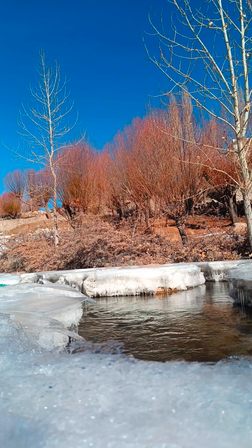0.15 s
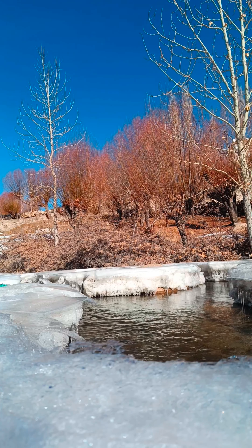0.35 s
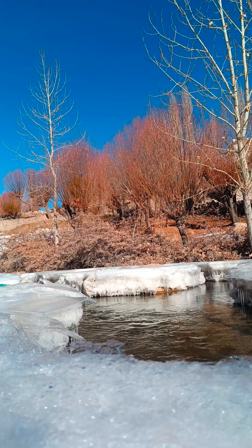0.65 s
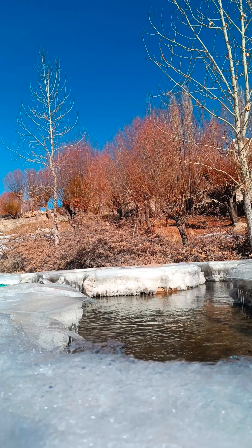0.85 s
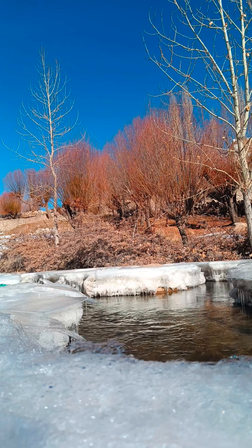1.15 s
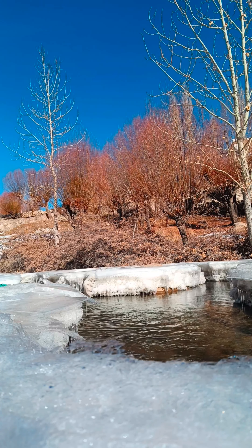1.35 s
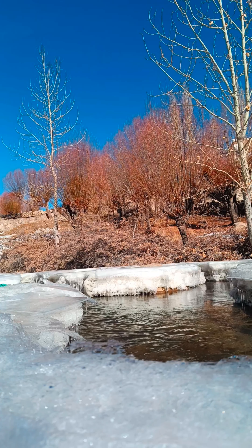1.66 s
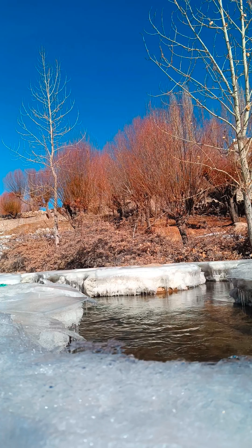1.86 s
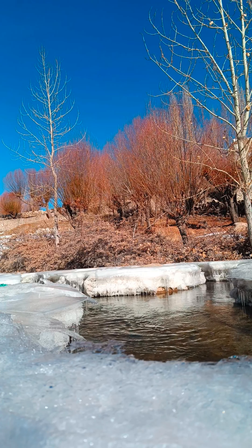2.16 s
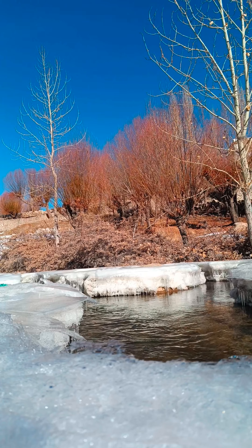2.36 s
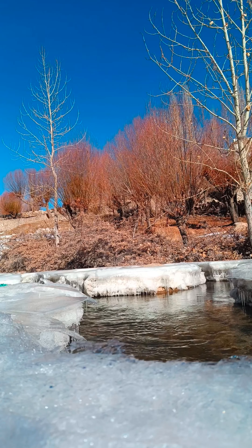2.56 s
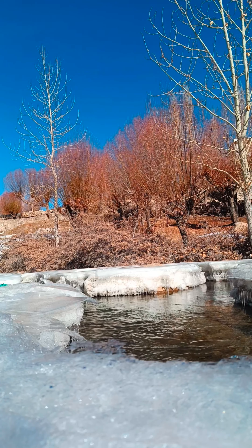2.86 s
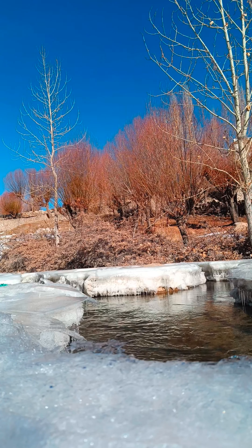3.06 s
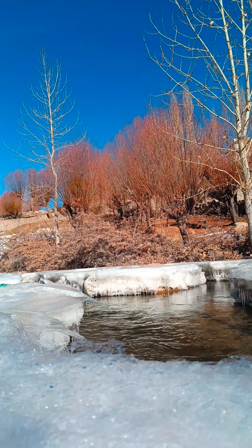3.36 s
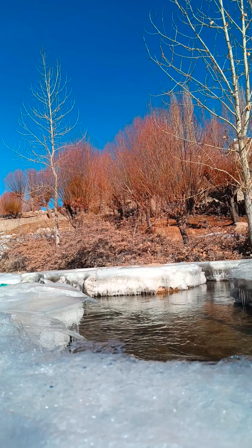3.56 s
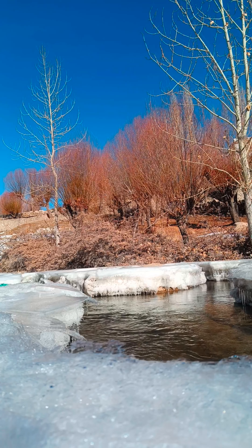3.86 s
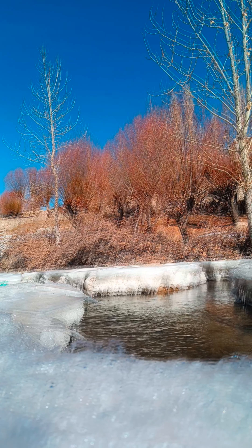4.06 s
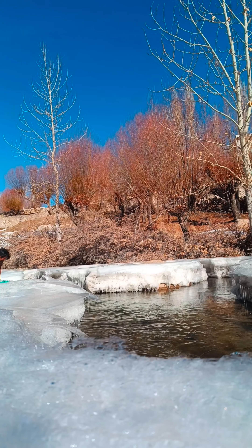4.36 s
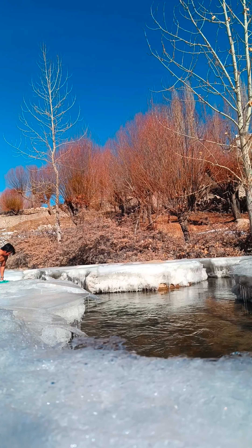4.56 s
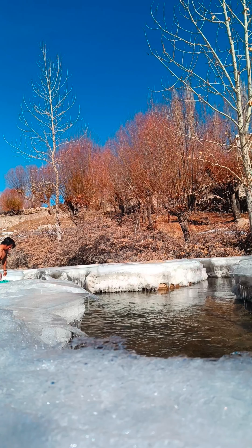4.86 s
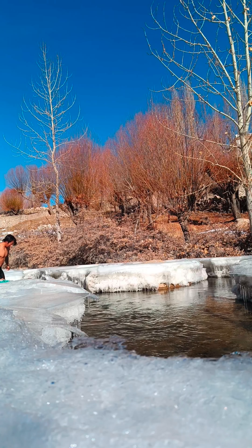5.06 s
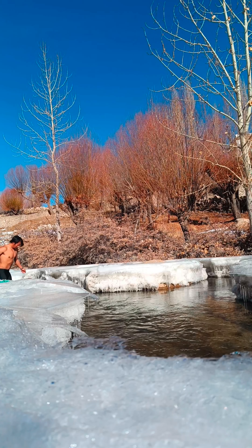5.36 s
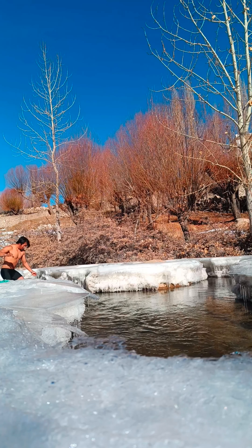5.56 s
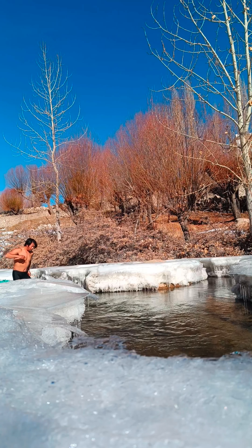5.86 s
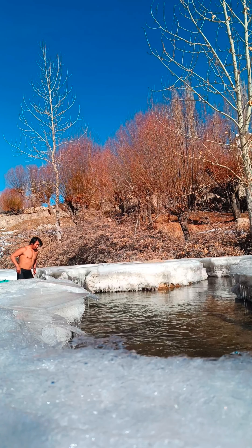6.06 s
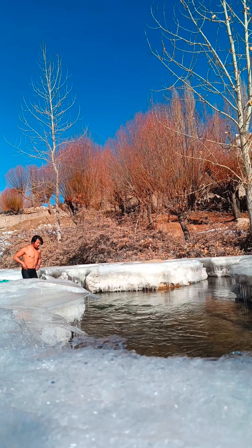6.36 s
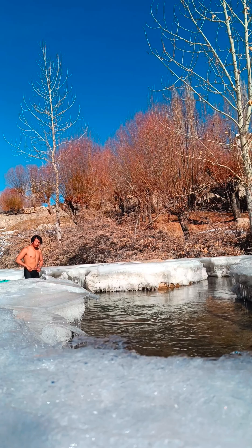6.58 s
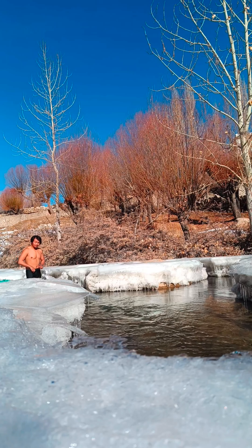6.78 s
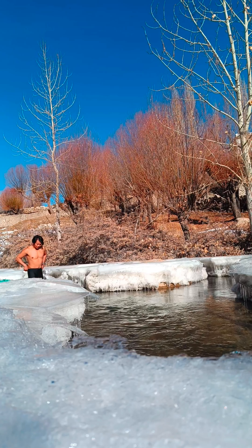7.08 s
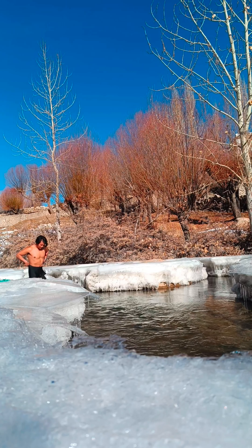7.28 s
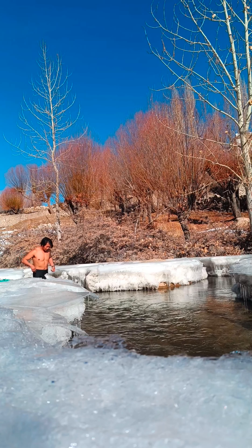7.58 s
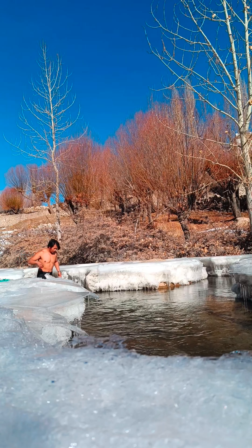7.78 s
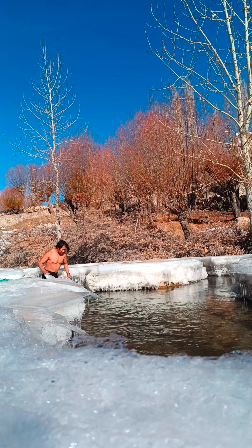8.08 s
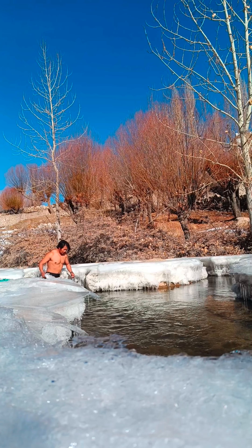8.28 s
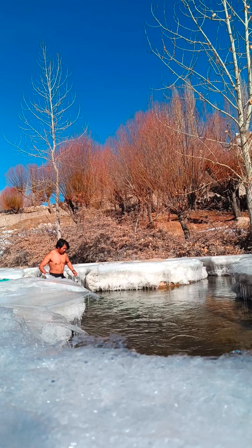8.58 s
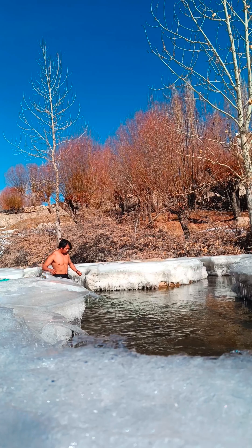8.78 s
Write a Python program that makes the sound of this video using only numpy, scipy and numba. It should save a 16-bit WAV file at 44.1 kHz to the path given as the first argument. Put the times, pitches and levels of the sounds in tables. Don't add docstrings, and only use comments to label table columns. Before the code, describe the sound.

Steady running water, heard close and wide in open air, with no other sources. Countless small bubbles merge into a soft rush above a deep, hollow rumble, under a thin, flickering spray hiss. Rounded plops and higher drops pop out throughout, the strongest glug near 5.4 seconds. A small bright splash just before four seconds is followed by a short dip in level.

```python
import sys
import numpy as np
from scipy import signal
from scipy.fft import rfft, irfft, next_fast_len
from scipy.io import wavfile
from numba import njit

SR = 44100
rng = np.random.default_rng(int(sys.argv[2]) if len(sys.argv) > 2 else 0)


def materialize(psi):
    bounded = np.clip(np.atleast_2d(psi).T, -1, 1)
    quanta = np.round(bounded * 32767).astype(np.int16)
    wavfile.write(sys.argv[1], SR, quanta)


def rack_gain(trim_db):
    fader = np.asarray(trim_db, float)
    return 10 ** (fader / 20)


N = 393813

# (frequency [Hz], left minus right [dB])
STEREO_LEAN = [(30, -2), (70, 1.2), (150, -.5), (330, -2), (700, -1.0), (1400, -.5), (2800, 1.5),
               (5600, -0.7), (9500, 3.5), (14000, -3.5)]
# (time [s], peak level [dB], pitch [Hz], left minus right [dB], burst over the hiss [dB])
DRIPS = [(0.0952, -40, 2810, 1, -6), (0.4219, -43.5, 2930, 2.5, 4), (0.4628, -49, 4760, 1.5, 9),
         (0.5237, -43.5, 4270, 0, 11), (0.6165, -39.5, 4870, 2, 8), (1.6786, -40.5, 3960, 0, 3),
         (2.165, -45.5, 5280, 2.5, 4), (2.2463, -31.5, 3070, 4, -6), (2.394, -46.5, 3000, 2, 6),
         (2.6993, -46.5, 4010, 1, 3), (3.496, -44.5, 4260, -.5, 4), (3.7479, -42.5, 3430, 1.5, 6),
         (3.9594, -45, 3440, 1, -6), (4.9821, -42.5, 2990, 2, -6), (5.1961, -45.5, 2930, .5, 8),
         (5.4226, -38, 4440, 0, -6), (5.4904, -43.5, 3860, -2, 5), (5.668, -45.5, 2610, 1.5, 10),
         (6.8194, -38.5, 2910, 4, -6), (7.1322, -36, 4860, 6, 6), (7.2704, -37, 5670, 6, 3),
         (7.3402, -40, 4150, -.5, 10), (7.6435, -39, 3940, .5, 3), (8.1733, -42, 5750, 1.5, 2)]


def rms_one(x):
    return x / np.sqrt(np.mean(x ** 2) + 1e-20)


def at_hz(points, hz):
    table_hz, value = np.array(points).T
    return np.interp(np.log(hz), np.log(table_hz), value)


def drift(rate):
    r = np.exp(-80 * np.pi * rate / SR)
    noise = rng.standard_normal(N // 40 + 2002)
    slow = signal.lfilter([1], [1, -2 * r, r * r], noise)[2000:]
    return np.interp(np.arange(N) / 40, np.arange(len(slow)), rms_one(slow))


def wide_noise(spectrum, shared_db, own_db, rate, count):
    # (frequency [Hz], left-right likeness [0 to 1])
    port_likeness = [(60, 0.99), (110, 0.99), (200, 0.99), (380, 0.9), (700, 0.89), (1290, 0.71),
                     (2380, 0.25), (4400, 0.4), (8120, 0.04), (15000, 0.02)]
    rumble_likeness = (32, 0.42)
    left_lag_s = -0.000026
    size = next_fast_len(N)
    hz = np.maximum(np.arange(size // 2 + 1) * SR / size, 1)
    low, high = spectrum[0][0], spectrum[-1][0]
    octaves_outside = np.maximum(np.log2(low / hz), 0) + np.maximum(np.log2(hz / high), 0)
    colour = rack_gain(at_hz(spectrum, hz) - 53 * octaves_outside)
    common, apart = rfft(rng.standard_normal((2, size))) * colour

    alike = np.clip(at_hz([rumble_likeness] + list(port_likeness), hz), 0, 1)
    middle, sides = np.sqrt(1 + alike) * common, np.sqrt(1 - alike) * apart
    lean = rack_gain(at_hz(STEREO_LEAN, hz) / 2)
    left = (middle + sides) * lean * np.exp(-2j * np.pi * hz * left_lag_s)
    right = (middle - sides) / lean

    place = np.clip(np.log(hz / low) / np.log(high / low), 0, 1) * (count - 1)
    out, together = 0, drift(rate)
    for k in range(count):
        share = np.maximum(1 - np.abs(place - k), 0)
        flicker = rack_gain(shared_db * together + own_db * drift(rate))
        out = out + flicker * irfft(np.array([left, right]) * share, size)[:, :N]
    return rms_one(out)


@njit
def add(out, start, gain, hz, t60, rise, onset, sr):
    for k in range(len(hz)):
        fall = np.log(1000) / (t60[k] * sr)
        for side in range(2):
            phase = 0.
            for i in range(min(int(t60[k] * sr), out.shape[1] - start[k, side])):
                phase += 2 * np.pi * hz[k] * (1 + rise[k] * i * fall) / sr
                swell = 1 - np.exp(-(i * hz[k] / sr / onset) ** 2)
                out[side, start[k, side] + i] += gain[k, side] * swell * np.exp(-fall * i) * np.sin(phase)


def bubbles(s, level_db, hz, t60, pan_db, rise, spread_s):
    lag = rng.normal(0, 1, len(s)) * spread_s
    start = np.clip(np.stack([s + lag / 2, s - lag / 2], 1) * SR, 0, N - 1).astype(np.int64)
    gain = rack_gain(level_db[:, None] + pan_db[:, None] * [.5, -.5])
    climb = np.full(len(s), max(rise, 0.))
    out = np.zeros((2, N))
    add(out, start, gain, np.minimum(hz, .35 * SR), np.clip(t60, .001, .3), climb, 2.6, float(SR))
    return out


def swarm(count, low_hz, high_hz, cycles, size_db, rise):
    pitch, size, when, side = rng.random((count, 4)).T
    hz = low_hz * (high_hz / low_hz) ** pitch
    level_db = size_db * np.minimum(-np.log(size + 1e-9), 2.5)
    return rms_one(bubbles(when * N / SR, level_db, hz, cycles / hz, 6 * side - 2, rise, .0001))


def single(s, level_db, hz, pan_db, longer, rise):
    t60 = longer * .047 * (hz / 1000) ** -0.79
    return bubbles(s, level_db, hz, t60, pan_db, rise, 0.)


def riffle(level_db):
    # (frequency [Hz], density [dB per Hz])
    rush_spectrum = [(250, -33), (420, -3.5), (477, -4.5), (600, 0.5), (738, -2.5), (858, 1), (1460, -8),
                     (2240, -16.5), (2800, -30.5), (3640, -53), (6160, -120)]
    rush = wide_noise(rush_spectrum, shared_db=.5, own_db=0.76, rate=10.5, count=6)
    deep = swarm(count=300, low_hz=547, high_hz=673, cycles=54.0, size_db=5.5, rise=0.012)
    gurgle = swarm(count=800, low_hz=780, high_hz=1299, cycles=52.0, size_db=4., rise=0.016)
    trickle = swarm(count=1200, low_hz=1300, high_hz=2260, cycles=64.0, size_db=3.5, rise=0.022)
    mix = rush + rack_gain(-13.0) * deep + rack_gain(-10.5) * gurgle + rack_gain(-17) * trickle
    return rack_gain(level_db) * mix


def boom(level_db):
    # (frequency [Hz], density [dB per Hz])
    hollow_spectrum = [(12, -40), (22, -13.5), (55, -4), (68, -6.5), (86, -1.5), (112, -9.5), (130, -7),
                       (148, 1.5), (176, -3.5), (215, -4), (260, -8.5), (320, -10), (372, -14.5),
                       (480, -25.5), (620, -24.5)]
    return rack_gain(level_db) * wide_noise(hollow_spectrum, shared_db=0.24, own_db=0.0, rate=2.5, count=5)


def lone_bubbles():
    # (time [s], peak level [dB], pitch [Hz])
    glugs = [(0.101, -29.5, 1010), (0.3072, -37, 1540), (0.475, -27, 866), (0.733, -25, 916),
             (1.1463, -31, 1540), (1.9974, -33, 2000), (2.2445, -24.5, 796), (2.246, -31, 1830),
             (2.399, -28, 616), (2.6534, -34, 1500), (3.484, -25, 980), (3.649, -29, 814),
             (3.975, -30, 834), (4.5522, -33, 1310), (4.553, -23, 987), (4.5815, -35, 1850),
             (4.742, -27, 826), (4.9811, -35, 1620), (5.421, -19.5, 800), (5.6715, -36, 1520),
             (6.341, -30, 920), (6.885, -27.5, 848), (7.298, -23, 940), (7.986, -25.5, 1010),
             (8.472, -23.5, 1000), (8.782, -24.5, 830)]
    # (time [s], peak level [dB], pitch [Hz], left minus right [dB])
    ticks = [(0.2109, -60, 10000, 2), (0.4633, -55, 8750, 3), (0.614, -56, 8040, 1),
             (0.8086, -54.5, 9570, 1.5), (0.847, -58, 8880, 1), (1.8332, -59, 8510, 1),
             (2.7003, -58, 8260, 2), (3.5369, -56, 11100, 1), (3.578, -46, 7000, 1),
             (4.3826, -57, 12300, 2), (4.636, -57, 8600, -1), (7.486, -50, 6700, 2),
             (4.3246, -52, 11200, 4.5), (4.3824, -54, 9930, 2), (4.8798, -58, 8210, 2),
             (6.4607, -53, 10000, 4.5), (7.08, -53, 10800, 6), (7.1327, -50, 8580, 7),
             (7.862, -60, 11000, 3), (7.9862, -47, 13000, -14), (8.7655, -60, 9700, 1.5)]
    # (time [s], peak level [dB], pitch [Hz], left minus right [dB])
    bounces = [(.4642, -46, 7250, 2.5), (.6176, -44, 5850, 2.5), (2.2462, -26, 2140, 1.5),
               (2.2625, -39, 2940, 2.5), (2.2632, -39, 2210, 1.5), (3.4765, -43, 4300, .5),
               (4.3012, -49, 6050, 1.5), (5.4906, -47, 6750, .5), (6.4432, -45, 6450, 3.5),
               (7.0434, -42.5, 2940, 1.5), (7.1327, -40, 5500, 4.5), (7.1756, -45, 4070, 1),
               (7.6545, -36, 2660, 5), (7.9864, -43, 15250, -12.5), (7.9866, -54, 10600, -10.5),
               (8.3852, -43, 3910, 1.5)]
    s, level_db, hz = np.transpose(glugs)
    out = single(s, level_db, hz, at_hz(STEREO_LEAN, hz), longer=1.04, rise=0.024)
    out = out + single(*np.transpose(DRIPS)[:4], longer=.95, rise=.012)
    out = out + single(*np.transpose(ticks), longer=1.0, rise=.01)
    return out + single(*np.transpose(bounces), longer=.9, rise=0.013)


def spits():
    # (time [s], burst over the hiss [dB])
    film_breaks = [(0.2074, 3), (1.0206, 3), (1.4885, 2), (2.2194, 4), (4.672, 3), (5.0709, 3), (5.3687, 5),
                   (5.7443, 5), (6.4423, 4), (7.1761, 5), (7.3846, 7)]
    bursts = [(row[0], row[-1]) for row in list(DRIPS) + list(film_breaks)]
    s, level_db = np.transpose(bursts)
    kicks = np.zeros(N)
    kicks[(s * SR).astype(int)] = rack_gain(level_db)
    dying = signal.lfilter([1], [1, -np.exp(-1 / (0.003 * SR))], kicks + 1e-18)
    soft = np.exp(-1 / (0.00062 * SR))
    return signal.lfilter([1 - soft], [1, -soft], dying)


def spray(level_db):
    # (frequency [Hz], density [dB per Hz])
    spray_spectrum = [(1470, -15), (2500, -1), (2790, -4.5), (3070, -2.5), (3570, -5.5), (3930, -4),
                      (4450, -8.5), (5810, -5), (6920, -11), (7800, -21), (10100, -50), (17200, -120)]
    # (frequency [Hz], density [dB per Hz])
    thin_hiss_spectrum = [(6500, -9), (7800, -3), (9500, 1.5), (11500, 0), (13500, -2), (15800, -5)]
    bursts, surge_db = spits(), .9 * drift(35.)
    hiss = wide_noise(spray_spectrum, shared_db=0.2, own_db=0.74, rate=31.0, count=5) * (1 + bursts)
    thin_hiss = wide_noise(thin_hiss_spectrum, shared_db=0.3, own_db=0.7, rate=30., count=3) * (1 + .55 * bursts)
    fizz = swarm(count=2500, low_hz=2607, high_hz=6870, cycles=50., size_db=4.0, rise=0.033)
    crackle = swarm(count=700, low_hz=3000, high_hz=6000, cycles=6., size_db=7.0, rise=.01)
    mist = swarm(count=900, low_hz=7500, high_hz=12000, cycles=70., size_db=3.5, rise=.01)
    mix = hiss + rack_gain(-15.5) * thin_hiss + rack_gain(-8.0) * fizz + rack_gain(-21) * crackle + rack_gain(-26.5) * mist
    return rack_gain(level_db + surge_db) * mix


def splash(splash_s):
    peak_db, rise_db, rise_s, dies_db_per_s = -60.5, 5, .065, 85
    t = np.arange(N) / SR - splash_s
    level_db = peak_db + np.where(t < 0, rise_db * t / rise_s, -dies_db_per_s * t)
    high_pass = signal.butter(2, 5000, "high", fs=SR, output="sos")
    bright = signal.sosfilt(high_pass, rng.standard_normal((2, N)))
    return rack_gain(level_db + 1.5 * drift(40.)) * (t > -rise_s) * rms_one(bright)


def flow_db(splash_s):
    lift_db, lift_s = 1.5, 0.15
    sag_s, sag_db, fall_s, recover_s = 4.01, 3.5, 0.26, 0.69
    t = np.arange(N) / SR
    lift = lift_db * np.maximum(1 - np.abs(t - splash_s) / lift_s, 0)
    sag = np.interp(t, [sag_s - fall_s, sag_s, sag_s + recover_s], [0, sag_db, 0])
    return lift - sag


def scene():
    # (time [s], level about the steady flow [dB])
    surges = [(0, -0.5), (.35, -1.5), (.8, 0), (1.3, 0.5), (1.9, 0), (2.4, -1), (3.1, 0), (3.65, -0.5),
              (3.8, -1.5), (4.7, 1), (5.5, -1), (5.95, 2), (6.3, -1), (6.8, .5), (7.3, 1), (7.7, 0),
              (8.2, -1), (8.6, 0)]
    splash_s = 3.6
    flow = flow_db(splash_s)
    churn = np.interp(np.arange(N) / SR, *np.transpose(surges))
    out = riffle(-38.0 + 0.95 * flow - 0.078 * churn)
    out = out + boom(-34.5 + flow + churn)
    out = out + lone_bubbles()
    out = out + spray(-55.5 + 0.91 * flow)
    return out + splash(splash_s)


def band_limit(x):
    return signal.sosfilt(signal.butter(12, 15765, fs=SR, output="sos"), x)


def record(dry):
    low_pass = signal.ellip(10, .3, 50, 15765, fs=SR, output="sos")
    mix = signal.sosfilt(low_pass, dry)
    return band_limit(mix)


dry = scene()
out = record(dry)
materialize(out)
```